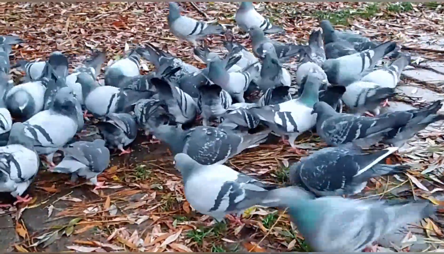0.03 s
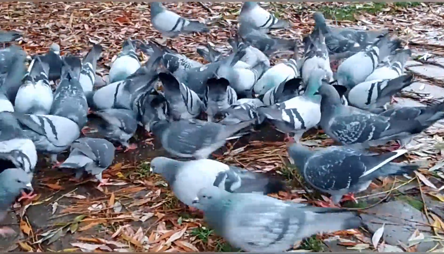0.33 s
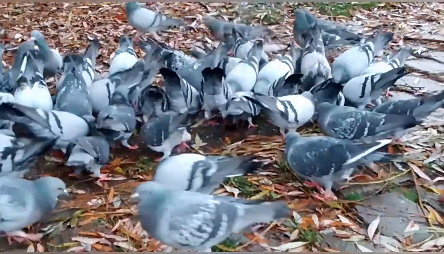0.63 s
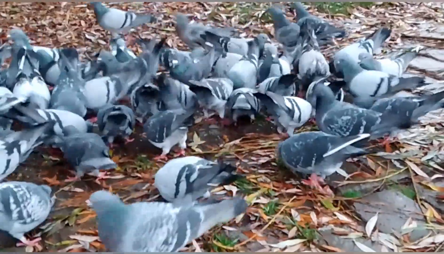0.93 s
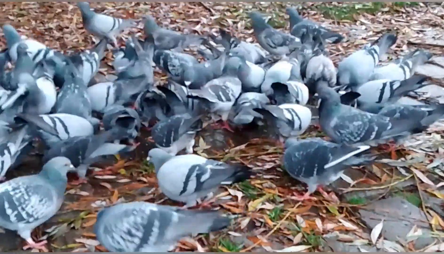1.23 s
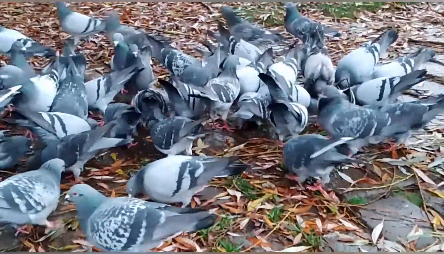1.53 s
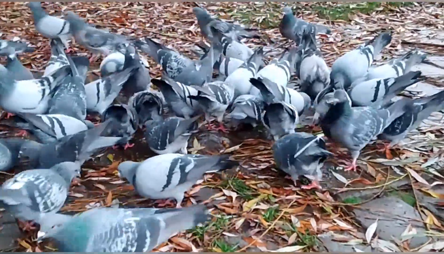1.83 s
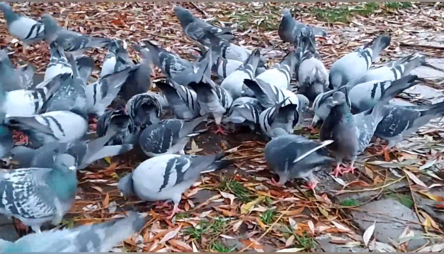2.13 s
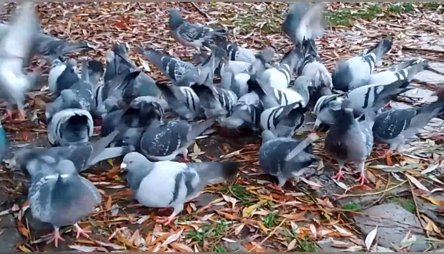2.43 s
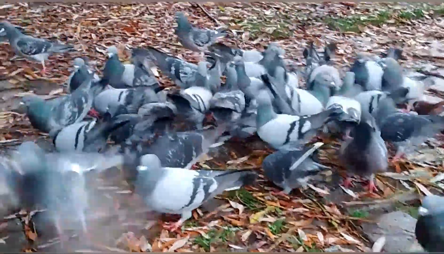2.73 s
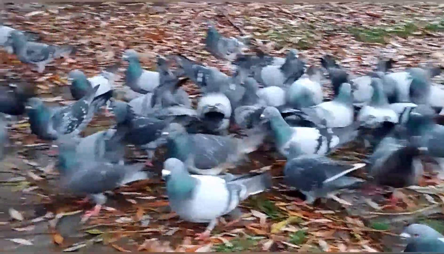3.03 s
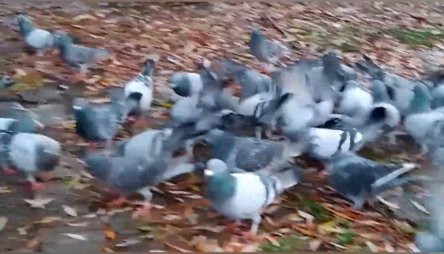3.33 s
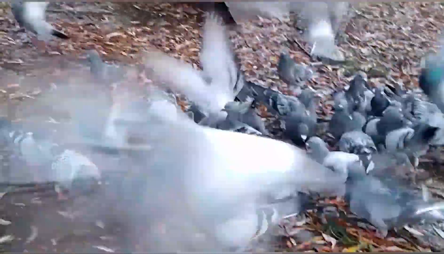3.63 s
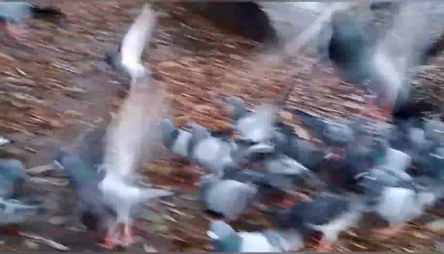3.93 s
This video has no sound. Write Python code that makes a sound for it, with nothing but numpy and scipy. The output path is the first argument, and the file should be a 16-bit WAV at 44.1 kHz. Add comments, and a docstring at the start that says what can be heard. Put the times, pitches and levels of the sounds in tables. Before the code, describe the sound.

Pigeon wings flap close by outdoors. For the first two seconds the flock pecks and rustles softly in dry leaves, with single wing flicks, faint coos in the first second and a distant town hum. From about 2 seconds a flurry of wingbeats and sharp snaps builds, easing slightly just after 3 seconds. From 3.5 seconds the flapping swells again, loudest at 4 seconds as the birds take off.

```python
"""Pigeons feeding and taking off

A flock pecks and feeds in dry leaves close by, with faint coos over a distant town.
Single wings flick and snap; then a flurry runs through the flock, eases, and the birds take off.
Each wing stroke pushes a low puff of air and rustles the feathers; wing tips that meet crack."""
import sys
import numpy as np
from scipy import signal
from scipy.fft import rfft, irfft
from scipy.io import wavfile
from scipy.ndimage import uniform_filter1d

SR = 44100
rng = np.random.default_rng(int(sys.argv[2]) if len(sys.argv) > 2 else 0)


def output_pcm(signal):
    """Save a mono or channel-first signal as 16-bit PCM at the path in sys.argv[1].

    Samples are clipped to [-1, 1] before scaling.
    """
    pcm = np.clip(np.atleast_2d(signal).T, -1, 1) * 32767
    wavfile.write(sys.argv[1], SR, np.round(pcm).astype(np.int16))


N = 176400

BARBS_PER_S = 5000


def undb(db):
    """Decibels to gain."""
    return 10 ** (np.asarray(db) / 20)


def unit(x):
    """Scale to rms 1."""
    return x / np.sqrt(np.mean(x ** 2))


def clock():
    """Time of each sample in s."""
    return np.arange(N) / SR


def fader(rows):
    """Gain along a curve of (time_s, level_db) points."""
    return undb(np.interp(clock(), *np.array(rows).T))


def noise():
    """White noise."""
    return rng.standard_normal(N)


def walk(rate_hz):
    """Smooth random drift, rms 1."""
    hold = int(SR / rate_hz)
    steps = np.repeat(rng.standard_normal(N // hold + 1), hold)
    return unit(uniform_filter1d(steps, hold)[:N])


def colour(x, points):
    """Minimum-phase EQ through (freq_hz, gain_db) points, scaled to keep the power of white noise."""
    size = 4096
    hz, db = np.array(points).T
    bins_hz = np.arange(size // 2 + 1) * SR / size
    gain = unit(undb(np.interp(np.log(bins_hz + 1), np.log(hz), db)))
    cepstrum = irfft(np.log(gain))
    cepstrum[1:size // 2] *= 2
    cepstrum[size // 2 + 1:] = 0
    return signal.fftconvolve(x, irfft(np.exp(rfft(cepstrum))))[:N]


def crackle(per_s, scatter_db):
    """Random tiny clicks of uneven size, rms 1."""
    sizes = undb(scatter_db * np.clip(noise(), -3, 2.6))
    return unit((rng.random(N) < per_s / SR) * np.sign(noise()) * sizes)


def arch(start, length):
    """A rounded swell over one sound."""
    return np.sqrt(np.sin(np.pi * np.clip((clock() - start) / length, 0, 1)))


def wavering_phase(hz, depth, rate_hz):
    """Phase of a tone whose pitch wanders at random."""
    return 2 * np.pi * np.cumsum(hz * (1 + depth * walk(rate_hz))) / SR


def town():
    """A bed of distant town wash, with the low hum of a far engine."""
    # wash spectrum: freq_hz, gain_db
    wash_eq = [(25, 5), (50, -3), (78, 3), (110, -7.5), (165, -16), (250, -0.5), (450, 0), (900, -3),
               (2000, -5), (3200, -9.5), (4500, -15), (8000, -20), (11000, -33), (15000, -37)]
    # engine fader: time_s, level_db
    hum_levels = [(0, -65), (.4, -63), (.55, -80), (4, -64)]
    wash = undb(-55 + .5 * walk(2.3)) * colour(noise(), wash_eq)
    hum = unit(np.sin(wavering_phase(hz=73.5, depth=.073, rate_hz=18)))
    return wash + hum * fader(hum_levels)


def leaves():
    """Feet and beaks set off short crinkles in the dry leaves."""
    # feeding fader: time_s, level_db
    feeding = [(0, -58.5), (.15, -62), (.3, -67.5), (.55, -72), (.7, -65.5), (.84, -63), (.95, -59),
               (1.15, -64), (1.45, -64), (1.68, -67), (1.8, -61.5), (2.3, -58.5), (4, -55)]
    # dry leaf spectrum: freq_hz, gain_db
    leaf_eq = [(800, -8), (3000, -5), (6000, 0), (9500, 1), (12000, -2), (15500, -6.5)]
    t, ring_s = clock()[:SR // 20], .0063
    crinkle = rng.standard_normal(len(t)) * np.exp(-t / ring_s)
    steps = signal.fftconvolve(crackle(per_s=410, scatter_db=3), crinkle)[:N]
    return colour(unit(steps) * fader(feeding), leaf_eq)


def wingbeats(birds, beat_hz=8.5, puff_cycles=.058, swish_cycles=.094):
    """Each bird beats at its own drifting rate: envelopes of the air puffs and the feather swishes."""
    def envelope(power, wash):
        """Level out slow swings and add a steady wash from birds further off."""
        return np.sqrt((power / uniform_filter1d(power, SR // 6) + wash) / (1 + wash))

    puffs = swishes = 0
    for _ in range(birds):
        rate = beat_hz * np.exp(.15 * (rng.standard_normal() + .5 * walk(2.024)))
        phase = (rng.random() + np.cumsum(rate) / SR) % 1 - .5
        power = undb(-walk(5)) ** 2
        puffs += power * np.exp(-(phase / puff_cycles) ** 2)
        swishes += power * np.exp(-(phase / swish_cycles) ** 2)
    return envelope(puffs, wash=1), envelope(swishes, wash=.15)


def near_strokes():
    """The nearest wings stand out from the flock: power envelopes of their air and their feathers."""
    # close strokes: middle_s, half_width_s, puff_db, swish_db
    strokes = [(0.015, .006, -59.5, -59), (0.139, 0.016, -57.5, -60), (0.759, 0.0053, -57, -72),
               (.864, .008, -52, -61), (0.909, 0.0073, -55, -55), (1.788, 0.028, -81, -60),
               (1.92, 0.0036, -60, -60), (1.949, 0.0064, -45, -50), (2.068, 0.0075, -42, -44),
               (2.19, .012, -43.5, -45.5), (2.319, 0.0059, -42.5, -62), (2.421, 0.0092, -35.5, -41),
               (2.50, 0.0041, -52, -44), (2.542, 0.016, -41, -42), (2.661, 0.0071, -62, -40.5),
               (2.78, 0.0036, -42, -46), (2.806, 0.0088, -39.5, -40), (2.861, 0.0023, -35, -35),
               (2.971, 0.0051, -40, -37.5), (3.025, 0.0066, -37.5, -39), (3.079, .007, -38.5, -43),
               (3.135, 0.011, -38, -52), (3.321, 0.0036, -46, -44), (3.42, .008, -43, -47),
               (3.471, 0.0062, -39, -60), (3.564, 0.0097, -38, -44.5), (3.69, 0.005, -34, -39),
               (3.773, 0.015, -41.5, -38), (3.883, 0.0041, -34, -40), (3.917, 0.0053, -32, -30.5),
               (3.986, 0.004, -39, -36), (3.995, 0.0071, -51, -43)]
    t = clock()
    air, feathers = np.zeros((2, N))
    for middle, half, puff_db, swish_db in strokes:
        span = slice(*np.searchsorted(t, [middle - 3 * half, middle + 3 * half]))
        stroke = np.exp(-((t[span] - middle) / half) ** 2)
        air[span] += stroke * undb(puff_db) ** 2
        feathers[span] += stroke * undb(swish_db) ** 2
    return air, feathers


def wings():
    """Strokes push air and rub feather barbs; the hard strokes of the take-off add a midrange rush."""
    # faders for the flock's air, flurry rustle and take-off rustle: time_s, level_db
    air_levels = [(0, -76), (1.86, -64.5), (1.95, -51.5), (2.3, -48.5), (2.45, -42.5), (2.7, -43.5),
                  (2.85, -43), (3.1, -43.5), (3.3, -43.5), (3.52, -44.5), (3.62, -41), (3.8, -41),
                  (4, -36.5)]
    flurry_levels = [(1.85, -105), (1.97, -66), (2.12, -72), (2.2, -58), (2.3, -58), (2.37, -47.5),
                     (2.45, -44.5), (2.53, -48), (2.59, -45.5), (2.66, -41.5), (2.71, -44), (2.76, -40.5),
                     (2.85, -38.5), (2.92, -43), (3.0, -50.5), (3.2, -57), (4, -51)]
    take_off_levels = [(2.7, -93), (2.97, -52.5), (3.1, -46.5), (3.2, -51.5), (3.3, -60), (3.35, -71),
                       (3.39, -47.5), (3.51, -52.5), (3.62, -41), (3.71, -46.5), (3.8, -44), (3.89, -36.5),
                       (3.94, -38), (4, -30.5)]
    # spectra of those three layers and of the rush: freq_hz, gain_db
    air_eq = [(25, -21), (60, -13), (85, -11.5), (125, -13), (165, -26), (225, -2.5), (320, 1), (520, -0.5),
              (800, -5.5), (1050, -14.5), (1350, -33), (2200, -27), (4000, -31), (9000, -55)]
    flurry_eq = [(1000, -37), (3200, -22.5), (4500, -16), (5700, -12), (6400, -2.5), (8000, -3.5),
                 (9500, -1), (11200, -8.5), (12700, -4.5), (13500, -7), (14300, -4), (15500, -15)]
    take_off_eq = [(1000, -28), (3000, -30), (4500, -12.5), (6300, -14.5), (7400, -5), (8300, -4.5),
                   (9300, 4), (10700, -3), (12000, -16), (15500, -26)]
    rush_eq = [(300, -44), (750, -2.5), (1100, -2), (1450, -13), (2200, -22.5), (5000, -26)]
    puffs, swishes = wingbeats(birds=7)
    near_air, near_feathers = near_strokes()
    flurry, take_off = fader(flurry_levels), fader(take_off_levels)
    push = np.sqrt((puffs * fader(air_levels)) ** 2 + near_air)
    air = colour(noise() * push, air_eq)
    rush = colour(noise() * puffs * take_off, rush_eq) * undb(-6.5)
    # close swishes keep their own level, shared between the two rustles
    rub = np.sqrt(swishes ** 2 + near_feathers / (flurry ** 2 + take_off ** 2))
    rustle = colour(crackle(BARBS_PER_S, scatter_db=3) * rub * flurry, flurry_eq)
    rustle += colour(crackle(BARBS_PER_S, scatter_db=3) * rub * take_off, take_off_eq)
    return air + rush + rustle


def snaps_and_pecks(rise_s=.0006, tick=.47, dull_from_s=3.45):
    """Wing-tip snaps and a few faint pecks: one tick, a fast ripple of smaller ones, a lower crack."""
    # sharp clicks: start_s, decay_s, level_db (before trim), crack_db (relative to the click)
    clicks = [(.010, 0.0044, -49, -7), (.0168, 0.0027, -44, 1), (.1258, 0.0068, -40, -8.5),
              (.1325, 0.0018, -42, -14), (.231, .002, -59, -14), (.487, .004, -62, -12),
              (.572, .003, -58.5, -16), (.643, 0.0037, -57.5, -10), (.757, 0.0031, -52.5, -4),
              (.862, 0.007, -43.5, -6), (.869, 0.0034, -46, -4), (.928, .005, -51.5, -9),
              (.979, .006, -50, -4.5), (1.092, .005, -45, -1.5), (1.215, 0.007, -45, -3.5),
              (1.342, 0.011, -52, -10), (1.908, 0.0023, -42, 0.5), (2.031, .003, -46, -6),
              (2.152, .004, -47.5, -17), (2.340, 0.0031, -34, -28), (2.410, 0.012, -31.5, -21),
              (2.497, 0.007, -27, -10.5), (2.518, 0.0025, -37.5, -8), (2.619, 0.0097, -31, -12.5),
              (2.736, .007, -24, -17), (2.798, 0.0012, -37, -25), (2.837, 0.0036, -34, -29),
              (2.852, 0.0039, -34.5, -26), (2.862, 0.005, -35, -27), (2.888, 0.0036, -36.5, -10),
              (2.939, .003, -29.5, -37), (2.954, 0.0032, -37, -23), (3.001, .002, -42.5, -25),
              (3.073, 0.0033, -48.5, 1.5), (3.137, 0.0042, -41, -10), (3.365, 0.006, -34.5, -6),
              (3.381, 0.0012, -38, -17), (3.532, 0.0029, -28.5, -22), (3.594, 0.0024, -35.5, -16),
              (3.612, .003, -46, -25), (3.648, 0.0045, -38, -16), (3.688, .004, -52, -20),
              (3.796, 0.0045, -37, -4.5), (3.839, .003, -53, -20), (3.866, .002, -39, -20),
              (3.884, 0.0073, -35, -15), (3.895, 0.0033, -37, -22), (3.9135, .002, -26, -32),
              (3.953, .004, -27.5, -23), (3.9565, .002, -23.5, -29), (3.9772, 0.0081, -19, -10),
              (3.992, 0.0041, -33.5, -1.5)]  # the four from .231 to .643 s are pecks
    # spectra of the click and of the crack (in a snap, the feather shafts): freq_hz, gain_db
    click_eq = [(500, -21), (3000, -22), (4500, -12.5), (6500, -1), (9000, 1.5), (11000, -4.5),
                (13000, -4.5), (15500, -7.5)]
    crack_eq = [(150, 0), (500, 2), (1200, -0.5), (2700, -8.5), (4300, 2.5), (6000, 3.5), (9000, -14),
                (15000, -48)]
    size = 2600
    t = np.arange(size) / SR
    trim = np.sqrt(.006 * SR) * undb(.5)  # levels count as rms over 6 ms, lifted 0.5 dB
    bright, dull, cracks = np.zeros((3, N + size))
    ripples, body = crackle(BARBS_PER_S, scatter_db=4.5), noise()
    for k, (start, decay, db, crack_db) in enumerate(clicks):
        fade = np.exp(-t / decay) * (1 - np.exp(-t / rise_s))
        burst, crack = (x[k * size:(k + 1) * size] * fade for x in (ripples, body))
        burst /= np.linalg.norm(burst)
        burst[int(2 * rise_s * SR)] += tick
        gain, i = trim * undb(db), int(start * SR)
        bus = bright if start < dull_from_s else dull
        bus[i:i + size] += gain * burst / np.linalg.norm(burst)
        cracks[i:i + size] += gain * undb(crack_db) * crack / np.linalg.norm(crack)
    # later snaps lose their top, like the take-off rustle
    dull_eq = [(hz, db - 9.5 * (hz > 11500)) for hz, db in click_eq]
    return colour(bright[:N], click_eq) + colour(dull[:N], dull_eq) + colour(cracks[:N], crack_eq)


def coos(overtone_db=-18, roughness=.97):
    """Soft, throaty, nearly pure calls from within the flock, each sagging in pitch."""
    # calls: start_s, length_s, from_hz, to_hz, level_db
    calls = [(0.138, 0.2, 360, 333, -62), (0.262, 0.18, 286, 259, -60.5), (0.516, .2, 399, 394, -58.5),
             (0.645, 0.22, 385, 381.5, -56.5), (0.863, 0.19, 392, 377, -58.5)]
    out = np.zeros(N)
    for start, length, from_hz, to_hz, db in calls:
        glide = np.interp(clock(), [start, start + length], [from_hz, to_hz])
        phase = wavering_phase(glide, depth=.075, rate_hz=59.88)
        voice = np.sin(phase) + undb(overtone_db) * np.sin(2 * phase)
        voice *= 1 + roughness * walk(70)
        out += unit(voice) * arch(start, length) * undb(db)
    return out


def squeal():
    """One thin, flickering squeal far off in the town."""
    # its tones: start_s, length_s, pitch_hz, level_db
    tones = [(.74, 0.49, 3880, -70), (0.782, .045, 3900, -63), (.94, .19, 5500, -73)]
    out = np.zeros(N)
    for start, length, hz, db in tones:
        tone = np.sin(wavering_phase(hz, depth=.0028, rate_hz=230))
        out += unit(tone) * arch(start, length) * undb(db + 3.8 * walk(20))
    return out


def feather_whistles(width_hz=350):
    """Stiff flight feathers sing in the air stream as narrow, breathy bands."""
    # whistles: start_s, length_s, pitch_hz, level_db
    whistles = [(1.9, 0.48, 6300, -65.5), (2.6, 0.64, 6420, -60), (2.15, .28, 12000, -69),
                (2.42, .45, 13500, -66)]
    out = np.zeros(N)
    for start, length, hz, db in whistles:
        phase = 2 * np.pi * hz * clock()
        airy = np.sin(phase) * walk(width_hz) + np.cos(phase) * walk(width_hz)
        out += unit(airy) * arch(start, length) * undb(db)
    return out


def feather_zips(jitter=.027, glide=.045):
    """Barbs buzz where wings slide over each other: short click trains that rise slightly in pitch."""
    # slides: start_s, length_s, mean_clicks_per_s, level_db
    slides = [(1.927, 0.02, 580, -62), (2.046, 0.027, 560, -54), (2.173, 0.024, 550, -51.5),
              (2.301, .022, 550, -48.5)]
    # buzz spectrum: freq_hz, gain_db
    zip_eq = [(400, -2), (1000, -5), (2500, 1), (3800, 1), (5000, -12), (6400, -10), (10000, 3.5),
              (15000, -5)]
    t, out = clock(), np.zeros(N)
    unsteady = 1 + jitter * walk(400)
    for start, length, rate, db in slides:
        span = slice(*np.searchsorted(t, [start, start + length]))
        along = (t[span] - start) / length
        cycles = np.cumsum(rate * (1 + glide * (along - .5)) * unsteady[span]) / SR
        clicks = np.diff(np.floor(cycles), prepend=0)
        out[span] += unit(clicks * np.sin(np.pi * along)) * undb(db)
    return colour(out, zip_eq)


def yard(x, t60_s=.12, level_db=-14.5):
    """Faint, short reflections of the open yard."""
    t = clock()[:SR // 2]
    tail = rng.standard_normal(len(t)) * undb(-60 * t / t60_s)
    return undb(level_db) * signal.fftconvolve(x, tail / np.linalg.norm(tail))[:N]


def scene():
    """Mono mix: the close birds and their reflections over the distant town."""
    birds = wings() + feather_whistles() + feather_zips() + snaps_and_pecks() + leaves() + coos()
    return (birds + yard(birds) + town() + squeal())[None]


def record(dry):
    """A steep low-pass cuts the very top."""
    top_hz = 15600
    return signal.sosfilt(signal.ellip(10, .2, 70, top_hz, fs=SR, output="sos"), dry)


dry = scene()
out = record(dry)
output_pcm(out)
```